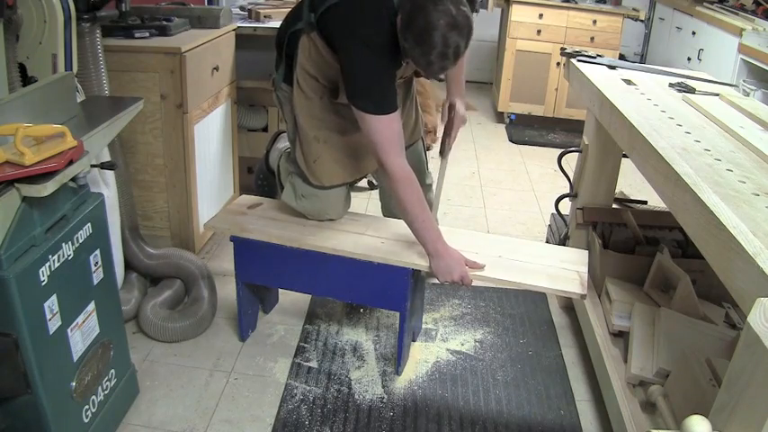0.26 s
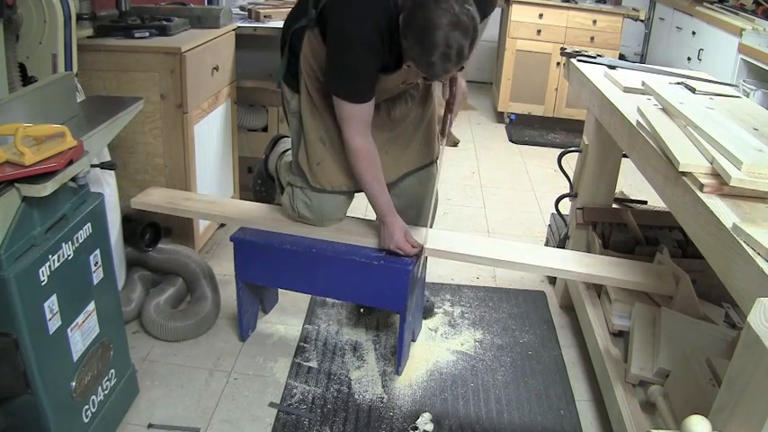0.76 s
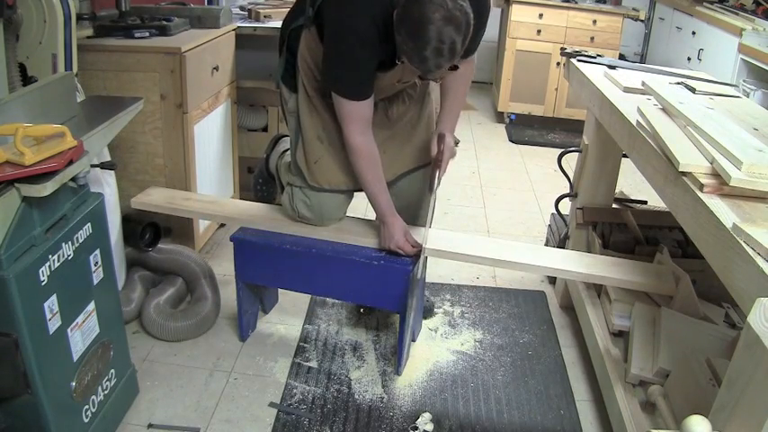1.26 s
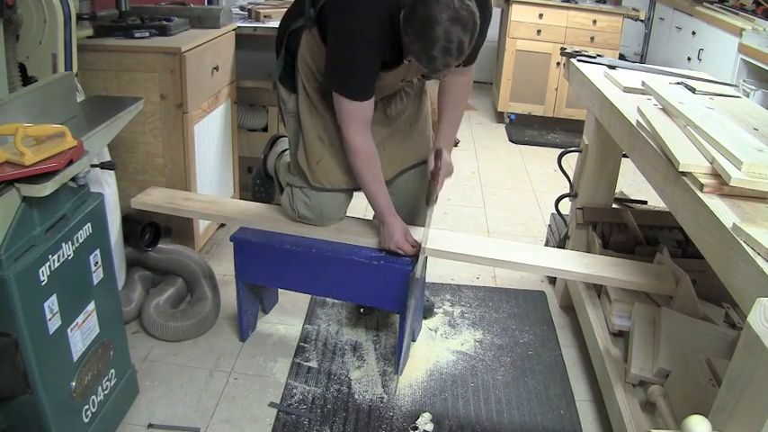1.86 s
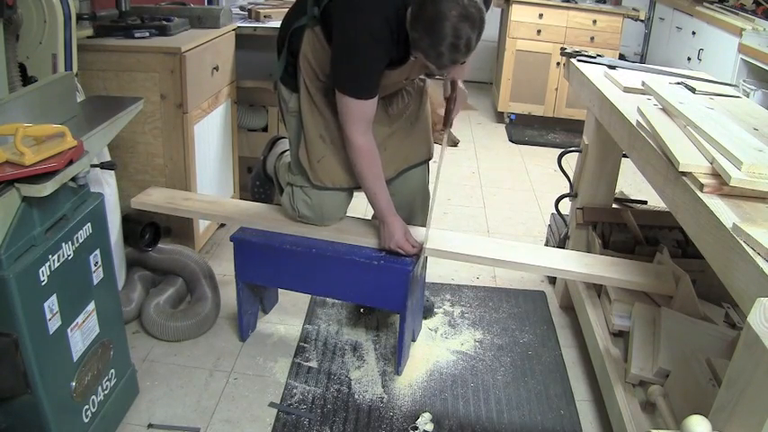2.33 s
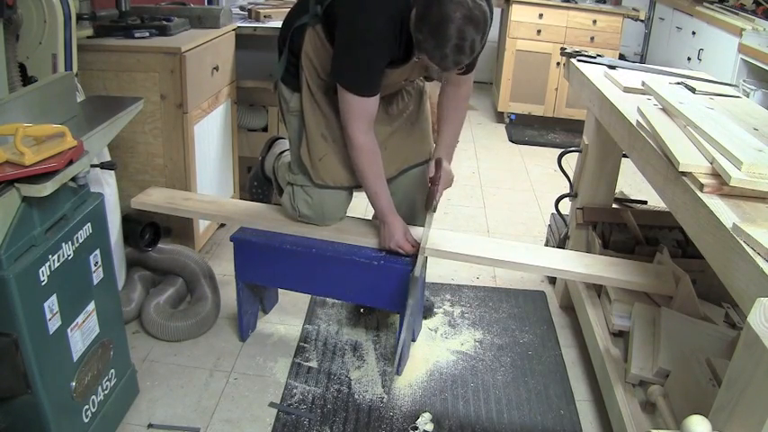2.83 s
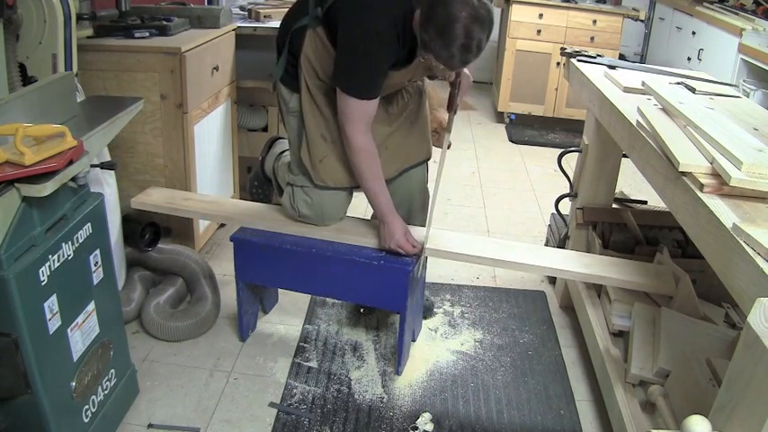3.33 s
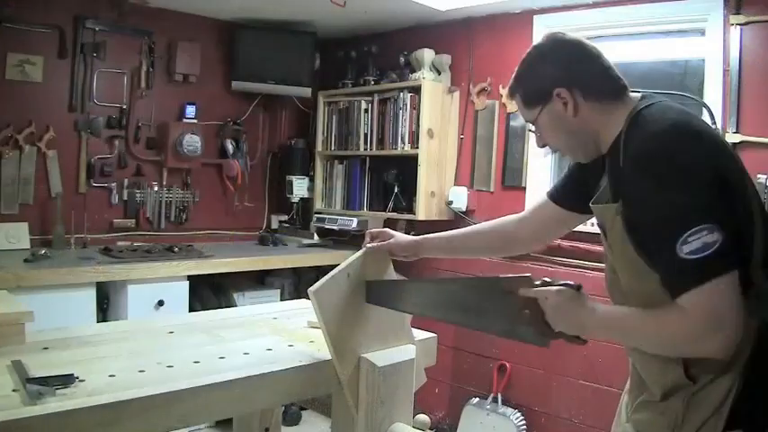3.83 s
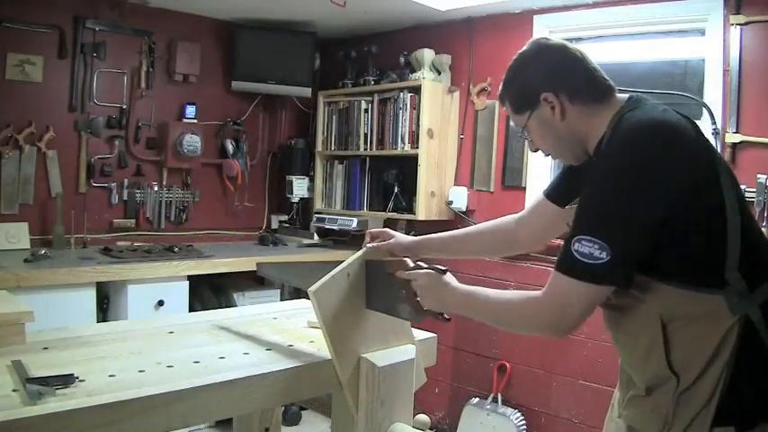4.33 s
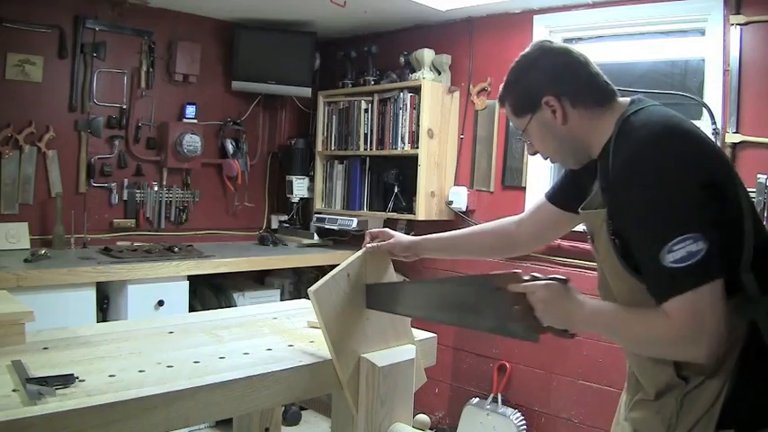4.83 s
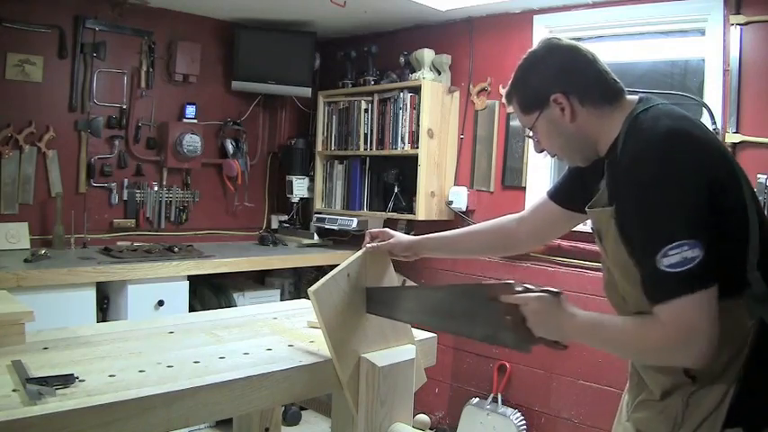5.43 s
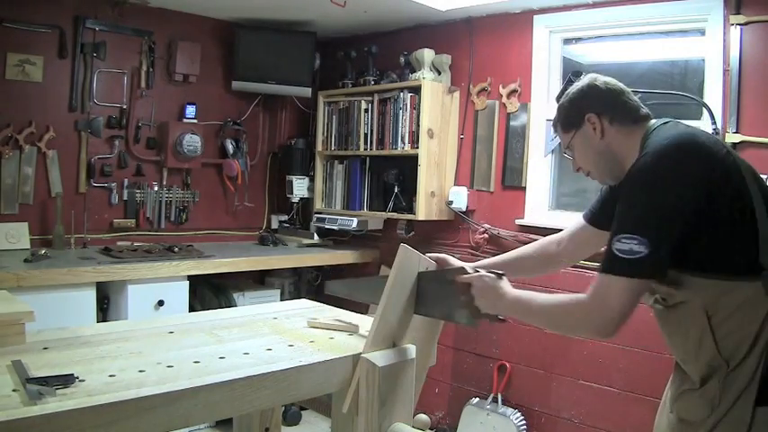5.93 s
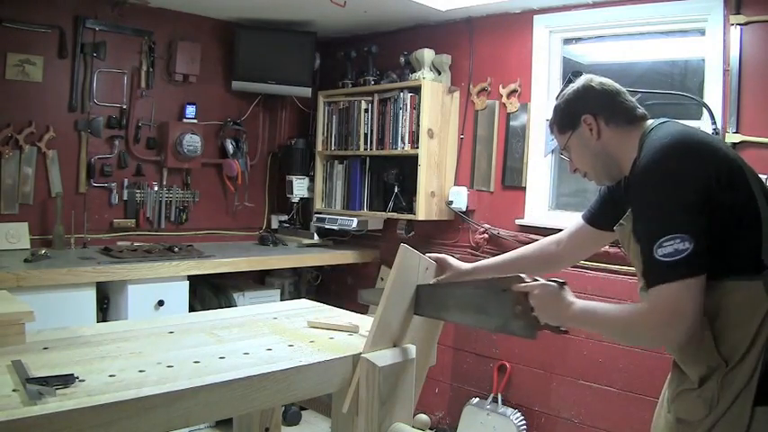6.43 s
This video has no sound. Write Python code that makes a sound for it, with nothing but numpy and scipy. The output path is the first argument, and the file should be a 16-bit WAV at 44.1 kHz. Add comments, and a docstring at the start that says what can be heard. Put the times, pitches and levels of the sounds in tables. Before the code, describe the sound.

Close hand sawing in a small, lightly reverberant workshop, the same in both channels. At 0 s a push stroke is already under way, gritty and bright with a ringing blade, followed by pulls at about 0.2 and 0.5 s as the first cut fades into the next. Strong pushes start near 0.8, 1.7, 2.5 and 3.4 s, with softer, thinner pulls near 1.2, 2.1, 2.9 and 3.6 s. Knocks crack at 0.8 s and a faint squeak comes at 1.1 s. From about 3.5 to 3.9 s the sound crossfades to an upright clamped board, more hollow and woody. Pushes at 4.0, 4.8 and 5.6 s alternate with pulls at 4.4 and 5.2 s; short squeals chatter around 4.1, 4.25, 4.9 and 5.4 s. After 5.7 s another cut rings around a steadier mid-low board tone, pulling at 6.1 and pushing at 6.4 s, ending in higher squeaks near 6.55 s.

```python
"""A handsaw cuts wood in a small workshop: four cuts, each fading into the next, first on a board
held on a low sawbench, then on one clamped upright in a vise. Most pushes bite harder than the pulls.
One uneven stream of tooth forces hisses as filtered noise at the kerf and rings resonances of blade,
board and bench. Snags knock on the board, a binding blade squeals in sliding tones, and
feedback delays add the room."""
import sys
import numpy as np
from scipy import signal
from scipy.io import wavfile
from scipy.ndimage import uniform_filter1d, minimum_filter1d

SR = 44100
rng = np.random.default_rng(int(sys.argv[2]) if len(sys.argv) > 2 else 0)


def master(y):
    """Save y as 16-bit WAV."""
    cut = np.clip(np.atleast_2d(y).T, -1, 1)
    pcm = np.round(cut * 32767)  # scale
    wavfile.write(sys.argv[1], SR, pcm.astype(np.int16))


N = 294147


def from_db(db):
    """Decibels to gain."""
    return np.exp(np.asarray(db) * (np.log(10) / 20))


def rms_one(x):
    """Scale to rms 1."""
    return x / np.sqrt(np.mean(x ** 2) + 1e-20)


def in_time(rows):
    """Each column of a curve at every sample."""
    s, *columns = np.transpose(rows)
    return [np.interp(np.arange(N) / SR, s, column) for column in columns]


def butter(x, hz, kind, order=2):
    """Causal Butterworth filter."""
    sos = signal.butter(order, np.clip(hz, 10, .45 * SR), kind, fs=SR, output="sos")
    return signal.sosfilt(sos, x)


def drift(hz):
    """Slow chance with spread 1: low-passed noise drawn at every 16th sample."""
    noise = rng.standard_normal((N + SR) // 16 + 2)
    slow = butter(noise, hz * 16, "low")[SR // 16:]     # the filter's start is dropped
    return np.interp(np.arange(N) / 16, np.arange(len(slow)), rms_one(slow))


def effort(start, attack, hold, release):
    """Effort of the arm through one stroke, 0-1: it speeds up, holds and slows down."""
    curve, rounding_s = 1.21, .025      # bend of the ramps; the arm rounds their corners
    corners = start + np.cumsum([0, attack, hold, release])
    ramps = np.interp(np.arange(N) / SR, corners, [0, 1, 1, 0])
    return np.clip(uniform_filter1d(ramps ** curve, size=int(rounding_s * SR)), 0, 1)


def swell(middle, length):
    """A smooth rise and fall, 0-1."""
    return np.cos(np.pi * np.clip((np.arange(N) / SR - middle) / length, -.5, .5))


def arm():
    """Levels in dB of rasp, bite, thrust and shudder, and the share of the effort that is a pull."""
    # push strokes: (start [s], attack [s], hold [s], release [s], rasp of the teeth [dB],
    # bite that rings the blade [dB], thrust on the board [dB], shudder of the bench [dB])
    pushes = [(-0.104, 0.072, 0.085, 0.25, -21.5, -11.5, -20, -55),
              (0.765, 0.099, 0.19, 0.18, -22.0, -13.5, -20.5, -40.5),
              (1.66, 0.1, 0.22, 0.14, -22.0, -14, -19, -36.0),
              (2.521, 0.14, 0.16, 0.2, -21.5, -15.0, -13.5, -29),
              (3.407, 0.1, 0.087, 0.271, -24.0, -17.0, -16, -35),
              (3.975, 0.079, 0.13, 0.27, -23.5, -14.5, -13, -40),
              (4.805, 0.06, 0.148, 0.246, -25.5, -15.5, -12, -50),
              (5.636, 0.09, 0.23, 0.165, -27.0, -18, -14.5, -45.5),
              (6.4, 0.083, 0.12, 0.081, -24.5, -18, -11, -43)]
    # pull strokes: (start [s], attack [s], hold [s], release [s], rasp [dB], bite [dB],
    # thrust [dB], shudder [dB])
    pulls = [(0.21, 0.064, 0.078, 0.21, -24.0, -20.5, -25, -47),
             (0.467, 0.2, 0.0033, 0.052, -33.5, -27.5, -28, -38),
             (1.167, 0.15, 0.15, 0.2, -25.5, -24.0, -30.5, -37),
             (2.057, 0.14, 0.135, 0.22, -24.5, -22, -26.5, -36),
             (2.941, 0.16, 0.091, 0.23, -21.5, -22, -23.5, -34.5),
             (3.629, 0.13, 0.068, 0.19, -27.0, -20, -18.5, -32),
             (4.375, 0.204, 0.023, 0.199, -23, -16, -16, -35.5),
             (5.187, 0.2, 0.074, 0.14, -26.0, -17.0, -16, -37.0),
             (6.066, 0.089, 0.125, 0.123, -26.0, -16.5, -13.0, -30)]
    # the saw judders in the cut and shakes the board harder: (middle [s], length [s], level [dB])
    judders = [(0.13, 0.088, -18.0), (0.266, 0.056, -17), (0.828, 0.15, -14.5), (1.46, 0.091, -18.5),
               (1.57, 0.15, -20.5), (1.757, 0.19, -14), (1.984, 0.05, -17.0), (2.332, 0.084, -19.0),
               (3.17, 0.1, -20), (3.953, 0.114, -21), (4.044, 0.033, -15), (4.895, 0.057, -6.0),
               (5.404, 0.082, -10.5), (5.986, 0.097, -11.0), (6.35, 0.038, -12.0), (6.459, 0.045, -8.5),
               (6.626, 0.038, -3.5)]
    # the bench rocks with a low thud: (middle [s], level [dB])
    thuds = [(0.85, -28), (1.76, -29), (3.93, -23.0), (4.03, -25), (4.74, -26.0), (4.84, -31),
             (5.14, -29.5), (6.46, -23)]
    thud_s = .11
    # rasp, bite, thrust, shudder: (power of the effort, level left while the saw turns round [dB])
    laws = [(1.03, -42.6), (0.97, -37), (.65, -31), (0.36, -42.5)]
    # the hand presses unevenly: spread of rasp, bite, thrust and shudder; its rate
    uneven_db, uneven_hz = (.5, 1.1, 1.6, 1.0), 16

    strokes = pushes + pulls
    efforts = [effort(*row[:4]) for row in strokes]
    powers = []
    for k, (follows, turn_db) in enumerate(laws):
        power = from_db(turn_db) ** 2
        for row, e in zip(strokes, efforts):
            power = power + (from_db(row[4 + k]) * e ** follows) ** 2
        powers.append(power)
    powers[2] += sum((from_db(db) * swell(s, length)) ** 2 for s, length, db in judders)
    powers[3] += sum((from_db(db) * swell(s, thud_s)) ** 2 for s, db in thuds)
    pulling = sum(efforts[len(pushes):]) / (sum(efforts) + 1e-6)
    levels_db = 10 * np.log10(powers) + np.outer(uneven_db, drift(uneven_hz))
    return levels_db, np.clip(pulling, 0, 1)


def teeth(speed, top_hz, jitter, pulse_db, grain_db, grain_hz):
    """Force on the fibres: it jumps as each tooth breaks through, unevenly, and varies with the grain."""
    tooth_hz = top_hz * speed * np.exp(jitter * drift(top_hz / 2))
    passed = np.cumsum(tooth_hz) / SR       # teeth gone by so far
    return rms_one(from_db(-pulse_db * (passed % 1) + grain_db * drift(grain_hz)))


def rasp(force, speed, top_tilt_db, dull_db, flicker_db):
    """Fibres snap in the kerf: bands of noise that flicker; a slow blade gives less treble."""
    # hiss of tearing fibres: (frequency [Hz], level per Hz [dB])
    spectrum = [(400, -6), (700, -1.5), (1200, -2), (2500, 0.5), (4000, 1), (5000, -0.4), (6000, -2),
                (7500, -3.5), (9500, -9), (12500, -12.5), (15500, -22)]
    points = np.array(spectrum)
    edges, out = np.geomspace(300, 17000, num=19), 0
    white = rng.standard_normal((2, N))     # neighbouring bands take different noises
    for k, (low, high) in enumerate(zip(edges, edges[1:])):
        hz = np.sqrt(low * high)
        level_db = np.interp(np.log(hz), np.log(points[:, 0]), points[:, 1])
        tilt_db = top_tilt_db * max(np.log2(hz / 7000), 0)
        slow_db = dull_db * (1 - speed) * np.log2(max(hz, 3000) / 5000)
        gain = from_db(level_db + tilt_db - slow_db + flicker_db * drift(25))
        out = out + gain * butter(white[k % 2], [low, high], "band", order=3)
    # the level refers to the bright part
    return force * out / np.std(butter(out, 3840, "high", order=4))


def resonate(x, hz, width):
    """One two-pole resonance with gain 1 on top; a narrow one rings longer."""
    r = np.exp(-np.pi * width / SR)
    slope = (x - np.concatenate([[0, 0], x[:-2]])) * (1 - r * r) / 2
    return signal.lfilter([1], [1, -2 * r * np.cos(2 * np.pi * hz / SR), r * r], slope + 1e-18)


def body(force, modes):
    """Tearing fibres kick each mode with a strength of their own; a steady force of 1 gives rms 1."""
    working = np.flatnonzero(force)
    span = slice(working[0], working[-1] + SR // 5)     # the ring outlasts the force
    push, out = force[span], np.zeros(N)
    for hz, width, db in modes:
        kicks = push * rng.standard_normal(len(push))
        out[span] += from_db(db) * resonate(kicks, hz, width)
    return out / np.sqrt(sum(from_db(db) ** 2 * np.pi * width / SR for hz, width, db in modes))


def steady(x, share):
    """Even out the beating of a ring: the teeth keep feeding it as fast as it dies."""
    power = uniform_filter1d(x ** 2, size=330) + 1e-9
    return rms_one(x / power ** (np.clip(share, 0, 1) / 2))


def flex(x, sway_s, rate_hz):
    """The saw flexes and shifts in the kerf: a drifting delay makes a body's pitches wander together."""
    at = np.arange(N)
    return np.interp(at + sway_s * SR * drift(rate_hz), at, x)


def squeals(force):
    """The blade binds in the kerf and chatters at one rough, sliding pitch."""
    # (start [s], end [s], start pitch [Hz], end pitch [Hz], wander of pitch [Hz], level [dB])
    bindings = [(1.033, 1.15, 1043, 994, 33, -21), (4.01, 4.14, 5820, 5870, 280, -28),
                (4.098, 4.158, 798, 786, 14, -14.5), (4.214, 4.306, 747, 680.5, 18, -18),
                (4.919, 4.98, 763, 793, 18, -16.5), (5.382, 5.464, 800, 781, 15.6, -21.5),
                (5.88, 5.96, 1105, 1110, 14, -26), (6.518, 6.575, 1437, 1410, 40, -18),
                (6.56, 6.653, 1295, 1290, 23, -22)]
    out = np.zeros(N)
    for start, end, start_hz, end_hz, wander_hz, db in bindings:
        span = np.arange(round(start * SR), min(round(end * SR), N))
        part = np.linspace(0, 1, len(span))
        hz = start_hz + (end_hz - start_hz) * part + wander_hz * drift(wander_hz * 2)[span]
        arch = np.sqrt(8 * part * (1 - part))
        out[span] += from_db(db) * arch * np.sin(2 * np.pi * np.cumsum(hz) / SR)
    return out * force


def snags(held, modes, damping_hz):
    """A caught tooth lets go: one knock on the board, damped by the hand that holds it."""
    # the teeth snag and jolt the board: (time [s], level [dB])
    jolts = [(0.798, -7), (0.817, 1.5), (1.117, -3.5), (1.674, -9.5), (1.704, -5.5), (2.539, -7.5),
             (2.565, -3.5), (2.599, -26), (3.524, 1), (3.927, -3), (4.734, -11), (4.869, -2), (4.893, -14),
             (5.667, -18), (5.697, -5), (6.444, -8), (6.502, -18)]
    t, out = np.arange(SR // 10) / SR, np.zeros(N + SR)
    knock = 0
    for hz, width, db in modes:
        decay = np.exp(-np.pi * (width + damping_hz) * t)
        knock = knock + from_db(db) * decay * np.sin(2 * np.pi * hz * t)
    knock = knock / np.abs(knock).max()
    for s, db in jolts:
        at = round(s * SR)
        out[at:at + len(t)] += held[at] * from_db(db) * knock
    return out[:N]


def cut_shares():
    """Gain of each of the four cuts; their powers add up to 1."""
    # one cut fades into the next: (start [s], end [s])
    fades = [(0.38, 0.67), (3.52, 3.93), (5.6, 5.86)]
    done = [np.ones(N)]
    done += [in_time([(start, 0), (end, 1)])[0] for start, end in fades]
    done += [np.zeros(N)]
    return [np.sqrt(np.clip(a - b, 0, 1)) for a, b in zip(done, done[1:])]


def workshop(x):
    """Ten feedback delays between the walls, duller on every round."""
    t60_s, wall_hz = 0.4, 6800      # decay time of the lows; low-pass of the walls
    out, dull = np.zeros(N), np.exp(-2 * np.pi * wall_hz / SR)
    lags = (rng.uniform(.007, .035, size=10) * SR).astype(int)
    for k, lag in enumerate(lags):
        loop, gain, state = x.copy(), from_db(-60 * lag / SR / t60_s), [0.]
        for i in range(lag, N, lag):
            sent = loop[i - lag:i]
            back, state = signal.lfilter([gain * (1 - dull)], [1, -dull], sent, zi=state)
            loop[i:i + lag] += back[:N - i]
        out += (loop - x) * (-1) ** k
    return rms_one(out) * np.std(x)


def scene():
    """One stream of tooth forces drives kerf, blade, board and bench, heard alike in both channels."""
    # resonances of the board, and of the blade in its kerf, for each way the work is held,
    # all with the columns (frequency [Hz], width [Hz], level [dB])
    # first cut, on the sawbench: (frequency [Hz], width [Hz], level [dB])
    bench_start_board = [(271, 48, 2.5), (344, 240, -8.5), (622, 12, 2.5)]
    bench_start_blade = [(838, 9, -7.5), (875, 240, -8), (1115, 10, 0), (1217, 12, 0), (1480, 9.2, -15),
                         (1480, 250, -5.5), (1715, 55, -4), (1890, 13, -8), (1980, 14, -6),
                         (2040, 220, -11.5), (2980, 430, -19), (3340, 12, -9)]
    # second cut, on the sawbench, pushing and pulling: (frequency [Hz], width [Hz], level [dB])
    bench_push_board = [(235.2, 19, -5), (275.3, 10.7, 0.5), (336, 7.5, -7), (414, 19, -23), (540, 13, -18),
                        (751, 11.4, -13)]
    bench_push_blade = [(783.8, 18, 1.5), (880, 11, -8), (955, 24, -4.5), (1009, 31, -0.5),
                        (1100, 7.7, -11), (1179, 11.7, -8), (1438, 68, -1), (1516, 12, 0.5), (1924, 7.9, 1),
                        (2040, 29, -8), (2233, 105, -7.5), (2550, 9, -11), (2620, 21, -20), (2923, 72, -3),
                        (3300, 15, -20), (3600, 190, -19), (3817, 30, -8.5)]
    bench_pull_board = [(227.3, 19.4, 0.5), (273, 12.6, -2.5), (339.4, 19, -8), (534, 29, -10.5)]
    bench_pull_blade = [(757, 48, 2.5), (954, 32, 7), (1171, 17, 3.5), (1414, 106, -0.5), (1984, 46, -2),
                        (2160, 96, -1.5), (2860, 250, -5), (3450, 350, -19)]
    # third and fourth cut, in the vise: (frequency [Hz], width [Hz], level [dB])
    vise_first_board = [(268, 55, -19.5), (423.6, 12, -15), (497, 17.5, -10), (556.5, 18.3, -1.3),
                        (608.3, 17.4, -2), (698, 25, -9.5)]
    vise_first_blade = [(790, 47, 1), (906, 13, -4.5), (993, 14, 0), (1107, 107, -3), (1250, 25, -6),
                        (1498, 190, -7), (1724, 63, -4.5), (2050, 73, -3.5), (2160, 18, -11),
                        (3000, 110, -23), (3140, 19, -14), (3510, 160, -12)]
    vise_second_board = [(253, 16, -25), (415, 21, -11.5), (502, 12, 9)]
    vise_second_blade = [(772, 38, 4.5), (1054, 92, 0.5), (1268, 10.8, -8), (1330, 60, -6), (1483, 16, 2.5),
                         (1550, 9.8, 1), (1770, 88, -9), (1984, 12.8, -3), (2160, 11.07, -2),
                         (2310, 160, -8.5), (2860, 18, -4), (3100, 248, -19), (3180, 28, -4),
                         (3510, 130, -9)]
    # resonances of the bench: (frequency [Hz], width [Hz], level [dB])
    bench_modes = [(82, 13, -7), (100.6, 9.5, -5), (142, 25, 1), (167, 45, -10.5)]

    (rasp_db, bite_db, thrust_db, shudder_db), pulling = arm()
    speed = from_db((rasp_db - rasp_db.max()) / 2)      # the hiss grows with the square of blade speed
    force = teeth(speed, top_hz=478.3, jitter=.35, pulse_db=5.0, grain_db=0.6, grain_hz=160)
    start, deep, first, second = cut_shares()
    # (gain, board modes, blade modes, steadiness 0-1, tilt of the top treble [dB per octave])
    holds = [(start, bench_start_board, bench_start_blade, .3, -5),
             (deep * np.sqrt(1 - pulling), bench_push_board, bench_push_blade, .3, 1),
             (deep * np.sqrt(pulling), bench_pull_board, bench_pull_blade, .3, 2),
             (first, vise_first_board, vise_first_blade, .3, -1.2),
             (second, vise_second_board, vise_second_blade, .65, -2.2)]
    blade = board = knocks = top_tilt_db = 0
    for share, board_modes, blade_modes, steadiness, tilt_db in holds:
        blade = blade + body(share * force * from_db(bite_db - 2.0), blade_modes)
        board_ring = steady(body(force, board_modes), steadiness)
        board = board + share * from_db(thrust_db - 1.4) * board_ring
        knocks = knocks + snags(share, board_modes, damping_hz=25)
        top_tilt_db = top_tilt_db + share ** 2 * tilt_db

    rubbing = rms_one(force + 0.31)     # the blade's sides rub on evenly between the teeth
    kerf = rasp(rubbing * from_db(rasp_db - 0.49), speed, top_tilt_db, dull_db=2.0, flicker_db=1.78)
    blade = flex(butter(blade, 646, "high", order=3), sway_s=.00018, rate_hz=8.2)
    saw = kerf + blade + squeals(force)

    board = flex(board, sway_s=0.00028, rate_hz=8.8)
    bench = steady(body(force, bench_modes), 0.81) * from_db(shudder_db - 3.5)
    bench = butter(bench, 85, "high", order=4)
    wood = butter(board + from_db(-3.0) * knocks, 185, "high", order=3) + bench

    # the walls send back mostly the bright part of the sound
    bright = butter(saw, 3600, "high", order=1)
    to_walls = saw + from_db(-2.5) * wood + from_db(4.5) * bright
    heard = saw + wood + from_db(-11.5) * workshop(to_walls)
    return np.array([heard, heard])


def record(dry, ceiling=0.85, release_db_per_s=150):
    """A fast limiter holds the peaks down; a steep low-pass cuts the top."""
    cutoff_hz = 15750
    over_db = 20 * np.log10(np.maximum(np.abs(dry).max(axis=0) / ceiling, 1))
    fall_db = release_db_per_s * np.arange(N) / SR
    held_db = np.maximum.accumulate(over_db + fall_db) - fall_db
    # the gain drops just ahead of a peak, without a step
    gain = uniform_filter1d(minimum_filter1d(from_db(-held_db), size=45), size=45)
    low_pass = signal.ellip(12, .1, 90, cutoff_hz, fs=SR, output="sos")
    return signal.sosfilt(low_pass, dry * gain)


dry = scene()
out = record(dry)
master(out)
```